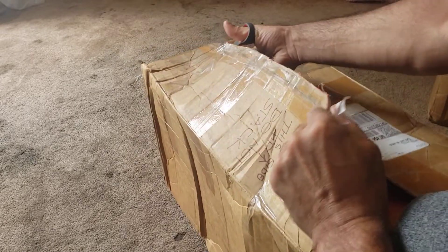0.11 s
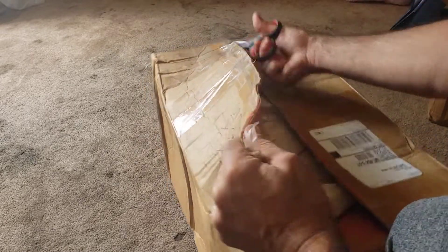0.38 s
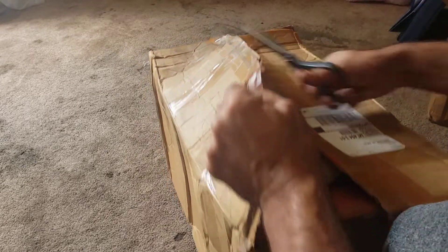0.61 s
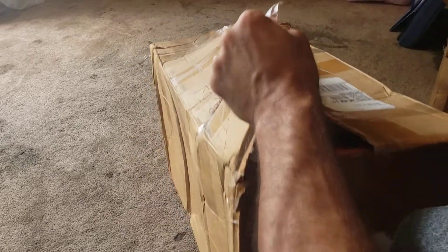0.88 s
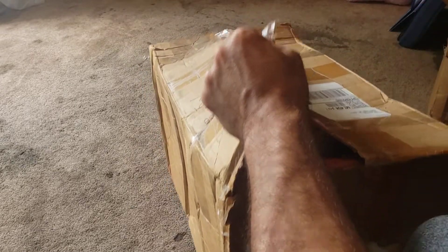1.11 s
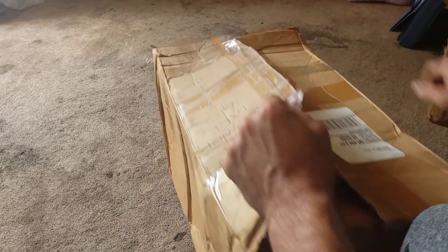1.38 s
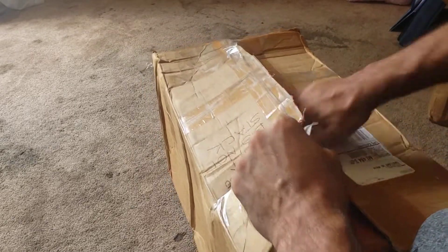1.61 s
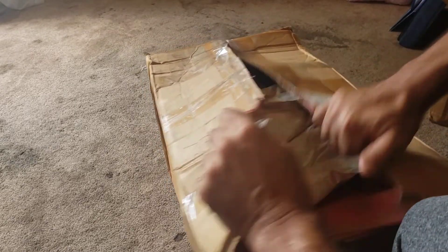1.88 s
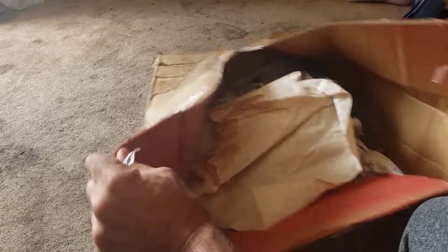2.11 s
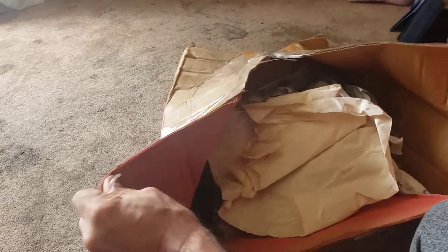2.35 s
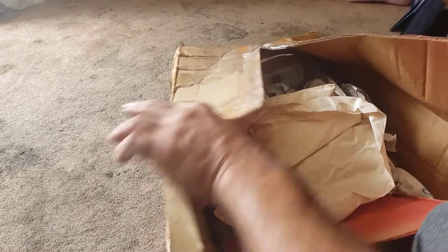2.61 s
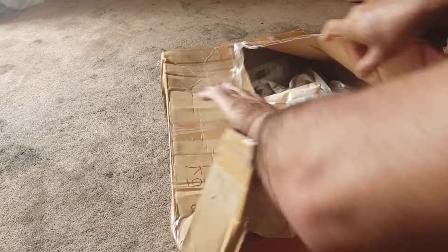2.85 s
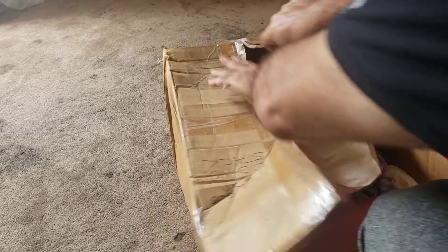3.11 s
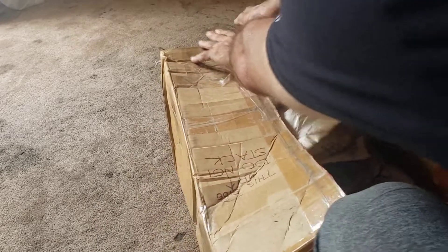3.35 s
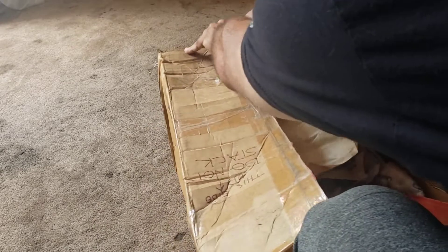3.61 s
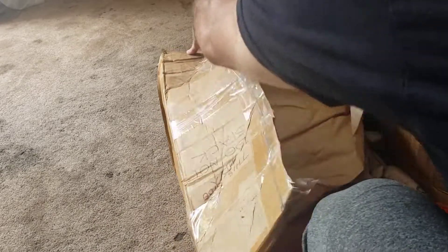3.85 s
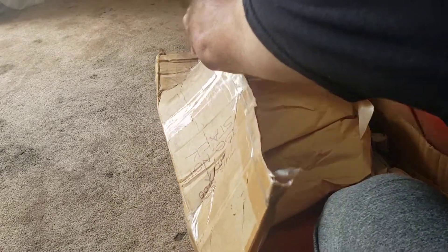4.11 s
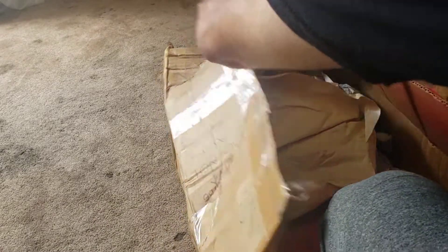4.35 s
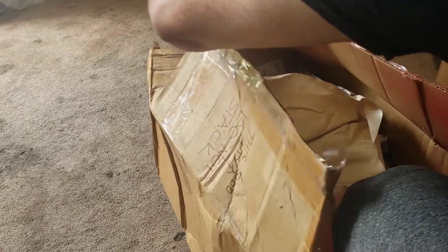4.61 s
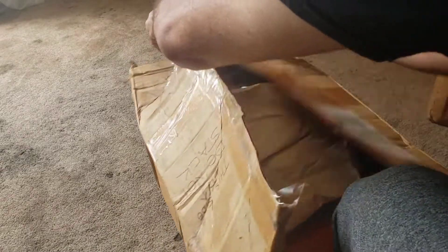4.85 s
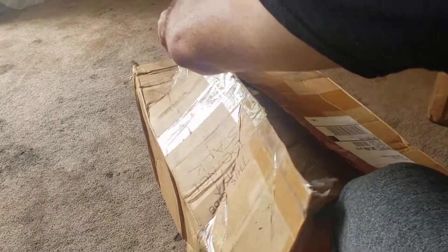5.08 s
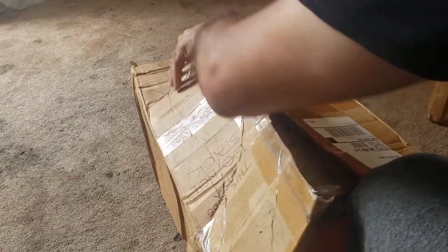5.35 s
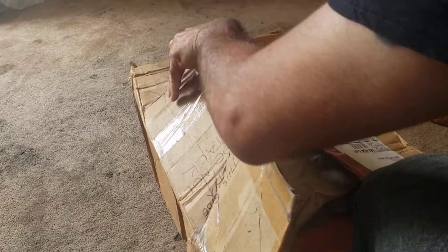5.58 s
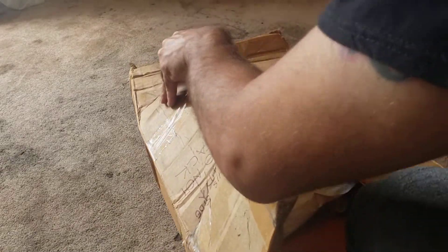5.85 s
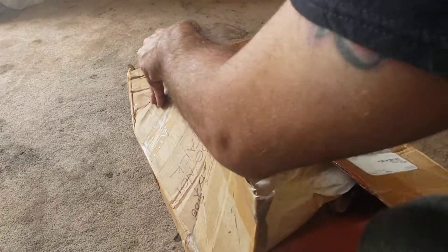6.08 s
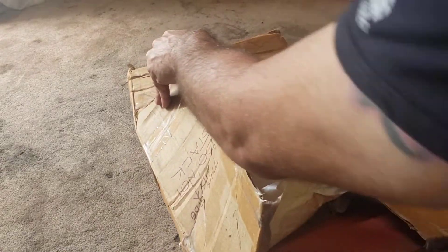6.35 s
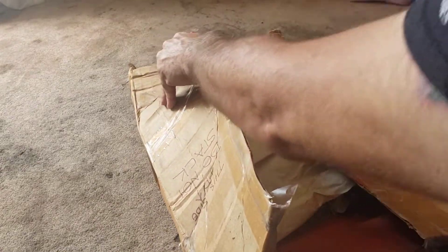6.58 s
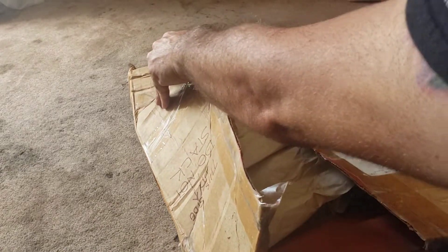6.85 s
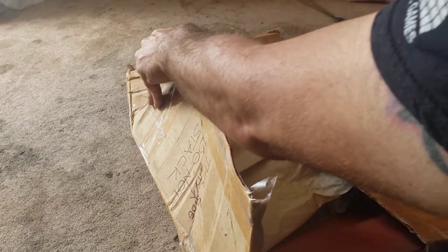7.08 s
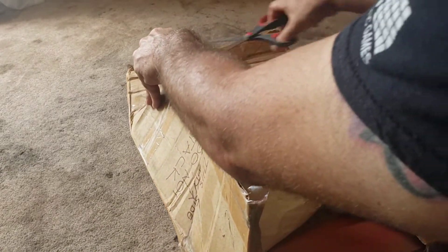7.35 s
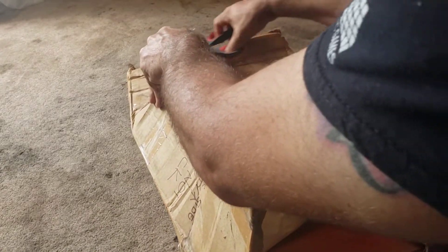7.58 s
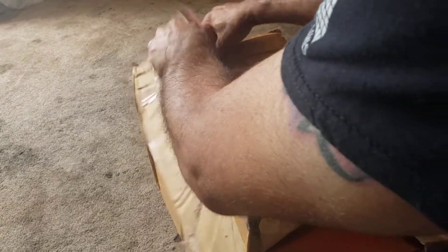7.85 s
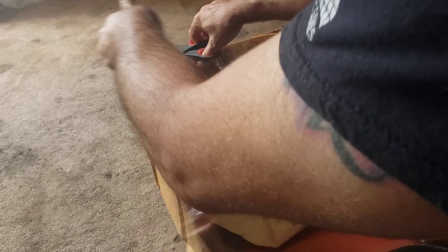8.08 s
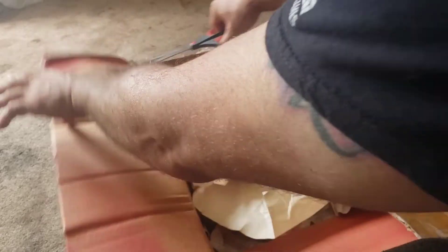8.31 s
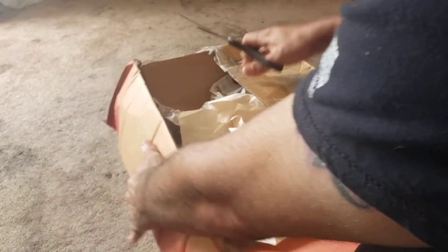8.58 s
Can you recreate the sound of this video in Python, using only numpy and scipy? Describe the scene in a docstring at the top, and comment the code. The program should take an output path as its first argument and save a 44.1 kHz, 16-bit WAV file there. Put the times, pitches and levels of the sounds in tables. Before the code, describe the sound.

Close-up of hands ripping open a taped cardboard box, sharp tape snaps, paper crinkling and hollow board thumps in a quiet room.

```python
"""Hands tear open a taped cardboard box stuffed with paper, in a quiet room, close to two microphones.
Breaking fibres are clumped random clicks over hiss, filtered into creak, scrape, tear and crinkle.
Single snaps are decaying noise bursts, and knocks on the board ring as sums of decaying sines.
The hollow box rumbles in its low modes under uneven pressure and booms when pushed.
Shifting paths, sparse room echoes and steady coloured noise surround these sounds."""
import sys
import numpy as np
from scipy import signal
from scipy.fft import rfft, irfft, next_fast_len
from scipy.io import wavfile
from scipy.ndimage import uniform_filter1d

SR = 44100
rng = np.random.default_rng(int(sys.argv[2]) if len(sys.argv) > 2 else 0)


def linear_from_db(decibels):
    """Turn decibels (scalar or array-like) into linear amplitude factors; 0 gives 1."""
    return 10 ** (np.asarray(decibels, float) / 20)


def transcribe(signal):
    """Save signal, clipped to [-1, 1], as a 16-bit WAV file at the path in sys.argv[1]."""
    frames = np.atleast_2d(signal).T
    limited = np.clip(frames, -1, 1)
    pcm = np.round(limited * 32767).astype(np.int16)
    wavfile.write(sys.argv[1], SR, pcm)


N = 383669

# coherence of a diffuse field at two microphones: frequency_hz, left_right_likeness
FIELD_LIKENESS = [(60, 0.93), (240, 0.71), (950, 0.1), (3770, 0.03), (15000, 0.012)]
# how creak, scrape, tear and crinkle (one row each) follow the hands:
# level_db at an effort of -45 dB, slope_db_per_db, board_share, paper_share
LAYER_LAWS = [(-45, 1, 1, 0.092), (-49, 0.99, 0.53, 0.18), (-46, 1, 0.12, 0), (-46, 0.95, 0.034, 0.85)]


def evened(x):
    """Normalization: scales a signal to rms 1."""
    return x / np.sqrt(np.mean(x ** 2) + 1e-20)


def read(points, hz):
    """Interpolation of a spectrum along a logarithmic frequency axis."""
    table_hz, value = np.transpose(points)
    return np.interp(np.log(hz + 1), np.log(table_hz + 1), value)


def add(mix, start_s, sound):
    """Superposition: adds a sound into the mix from a given time."""
    part = mix[..., max(round(start_s * SR), 0):][..., :sound.shape[-1]]
    part += sound[..., :part.shape[-1]]


def sides(difference_db):
    """Level difference between two channels, split evenly into left and right gains."""
    return linear_from_db(np.array([.5 * difference_db, -.5 * difference_db]))


def colour(points, size=4096):
    """Minimum phase: the causal response of energy 1 that follows from a magnitude spectrum."""
    level_db = np.maximum(read(points, np.fft.rfftfreq(size, 1 / SR)), -70)
    half = level_db * np.log(10) / 20
    full = np.concatenate([half, half[-2:0:-1]])
    # the phase is the Hilbert transform of the log magnitude
    taps = np.fft.ifft(np.exp(np.conj(signal.hilbert(full)))).real[:size // 2]
    return taps / np.linalg.norm(taps)


def fibres(breaks_per_s, spread_db, hiss_share, clump_db, clump_s):
    """Crackling noise: fibres break as random clicks of uneven size, in clumps, over a fine hiss."""
    chance, size = rng.random(N), rng.exponential(1, N)
    sign, fine, slow = rng.standard_normal((3, N))
    clicks = (chance < breaks_per_s / SR) * np.sign(sign) * linear_from_db(spread_db * np.minimum(size, 4.2))
    clumps = evened(signal.lfilter([1], [1, -np.exp(-1 / (clump_s * SR))], slow))
    share = np.clip(hiss_share, 0, 1)
    breaks = np.sqrt(1 - share) * evened(clicks) + np.sqrt(share) * fine
    return evened(breaks * linear_from_db(clump_db * clumps))


def burst(rise_s, fall_db_per_s):
    """Envelope of a rip or drag in dB: linear growth to its peak after a fade-in, then linear decay."""
    rise_s = max(rise_s, .002)
    grown = np.arange(1, SR // 2) / SR / rise_s
    fade_db = 20 * np.log10(np.minimum(4 * grown, 1))
    swell_db = 12.5 * (grown - 1)
    fall_db = -fall_db_per_s * rise_s * (grown - 1)
    return fade_db + np.where(grown < 1, swell_db, fall_db)


def level(base_db, per_db, board_share, paper_share):
    """Addition of incoherent powers: a layer's gain follows the steady effort and every rip."""
    # steady working of the hands: time_s, tearing_db, board_against_tearing_db, paper_against_tearing_db
    effort = [(0.0, -67, -10, 1.5), (.14, -66.5, 4, 3.5), (.29, -54, 5, 4.5), (.4, -51.5, -1, 0.5),
              (.55, -59.5, -4, -1.5), (.62, -69, -6, -1.5), (1.0, -78.5, 0, 2), (1.3, -93, 3, -1),
              (1.52, -77, 7, -6), (1.58, -65, -2, 0), (1.79, -51.5, -5, 4), (1.96, -51, -1.5, -2),
              (2.18, -43, 2.5, 3), (2.45, -60, -1, -2.5), (2.54, -50.5, 3.5, -2.5), (2.68, -49.5, 2, -3),
              (2.85, -52.5, 5, 5.5), (3.15, -44, -1.5, 3.5), (3.471, -44.5, -4.5, -0.5),
              (3.69, -52, 4.5, -1.5), (3.87, -42.5, -11, -2), (4.09, -54.5, -5, -2),
              (4.37, -51.5, -7, -4.5), (4.54, -67.5, 2, -4), (4.75, -58, 3.5, -0.5),
              (5.14, -67.5, -14, -1.5), (5.3, -60.5, -24, 4), (5.47, -57.5, -5, 8), (5.83, -65, -10, 2.5),
              (5.88, -76.5, 0.5, 7.5), (6.1, -80.5, -1, 8.5), (6.45, -90.5, 7, 13), (6.62, -93.5, 9.5, 2),
              (6.9, -91, 16.5, 10), (7.15, -79, -3, 8.5), (7.37, -85.5, -4, 13), (7.539, -74, -10, -2),
              (7.8, -81, 8, 4.5), (8.02, -58, 5.5, -3), (8.27, -57, -1.5, 3), (8.7, -63.5, -3, 0.5)]
    # sudden rips and rustles: start_s, rise_s, tearing_db, board_against_tearing_db, fall_db_per_s
    rips = [(0.0, 0.024, -46.5, -5.5, 149), (.344, .003, -37, -14, 352), (.74, .015, -66, -33, 200),
            (0.448, 0.048, -47, -1.5, 300), (1.085, 0.014, -61, -32, 255), (2.01, 0.016, -29.5, -1, 254),
            (2.239, 0.055, -34.5, 2, 147), (2.54, 0.011, -45, -7, 202.5), (2.62, 0.015, -39.5, -25, 149),
            (2.73, 0.02, -39, -4, 99), (2.891, .03, -38.5, -17, 89.5), (3.228, 0.087, -37.5, -3.5, 119),
            (3.0, .02, -50, -6.5, 100), (3.56, 0.069, -36, -12.5, 254.5),
            (3.77, 0.086, -35.5, -19.5, 400.5), (3.893, 0.048, -19.5, -5, 262),
            (4.399, 0.021, -49, -0.5, 159.5), (4.571, 0.018, -45, -12, 198), (4.659, .006, -49, -8, 151.5),
            (4.8, 0.034, -46, -1.5, 90), (5.179, 0.017, -49, -10.5, 63), (6.648, 0.0047, -62.5, 14, 209),
            (7.541, .1, -50, -3, 243), (7.851, 0.017, -25, -1.5, 211), (8.141, .01, -55, 4, 200),
            (7.94, 0.009, -44, 12, 307), (8.277, 0.0045, -50, 4, 142), (8.438, .006, -54, 4, 136),
            (8.56, 0.021, -50.5, -1, 137)]

    def law(tearing_db, board_db):
        return base_db + per_db * (tearing_db + 45) + board_share * board_db

    time_s, tearing_db, board_db, paper_db = np.transpose(effort)
    steady_db = law(tearing_db, board_db) + paper_share * paper_db
    power = linear_from_db(np.interp(np.arange(N) / SR, time_s, steady_db)) ** 2
    for start_s, rise_s, peak_db, rip_board_db, fall in rips:
        add(power, start_s, linear_from_db(law(peak_db + burst(rise_s, fall), rip_board_db)) ** 2)
    return np.sqrt(power)


def handling():
    """Fracture and friction: creaking, scraping, tearing and crinkling layers share many breaks."""
    # spectra of creaking and scraping board, tearing tape and crinkling paper:
    # frequency_hz, relative_level_db (per Hz)
    creak = [(160, -20.5), (280, -3.5), (613, -2), (737, -3.5), (1100, -11.5), (1430, -31.5), (2420, -120)]
    scrape = [(590, -31), (1000, -11), (1550, -8.5), (2090, -11), (3000, -14), (3900, -34), (6600, -120)]
    tear = [(1760, -30.5), (3000, -9), (3900, -4), (4310, -4.5), (4620, -4), (5790, -1), (8500, -7),
            (11000, -42.5), (18700, -120)]
    crinkle = [(5000, -37), (8500, -1.5), (11600, 1.5), (15100, 4), (16000, -3.5)]
    # cardboard dragged over cardboard: start_s, rise_s, scrape_db, fall_db_per_s
    drags = [(2.011, 0.0036, -31.5, 900), (2.62, 0.017, -44, 196), (2.72, 0.019, -43, 115),
             (2.98, 0.026, -42, 161), (3.895, 0.04, -19.5, 279), (4.4, 0.0083, -46, 215),
             (5.18, .01, -61, 109), (5.38, 0.15, -66, 50), (5.68, 0.048, -84, 65), (7.57, .07, -62, 258),
             (7.859, 0.0032, -33, 256), (8.06, 0.017, -50, 150)]

    shared = fibres(600, 5, 0.5, 1.6, .014)
    board = fibres(700, 3.9, .45, 1.4, 0.016)
    tape = fibres(1700, 4.4, 0.42, 0.43, 0.046)
    paper = fibres(2300, 4.5, 0.72, 4.5, 0.057)
    # spectrum, own breaks, amount of shared breaks
    layers = [(creak, board, .45), (scrape, board, .6), (tear, tape, .7), (crinkle, paper, .65)]

    gains = [level(*law) for law in LAYER_LAWS]
    drag_power = np.zeros(N)
    for start_s, rise_s, scrape_db, fall in drags:
        add(drag_power, start_s, linear_from_db(scrape_db + burst(rise_s, fall)) ** 2)
    gains[1] = np.sqrt(gains[1] ** 2 + drag_power)  # drags sound in the scrape layer

    out = np.zeros(N)
    for gain, (spectrum, own, amount) in zip(gains, layers):
        breaks = evened(own + amount * shared) * gain
        out += signal.oaconvolve(breaks, colour(spectrum))[:N]
    return out


def hollow(shake, modes):
    """Modal resonance: a shaking force rings low modes, through a response of energy 1."""
    t = np.arange(12000) / SR
    ring = np.zeros(len(t))
    for hz, width_hz, db in modes:
        decay_db = 8.7 * np.pi * width_hz * t  # a wider resonance dies sooner
        ring += linear_from_db(db - decay_db) * np.sqrt(width_hz) * np.sin(2 * np.pi * hz * t)
    return signal.oaconvolve(shake, ring / np.linalg.norm(ring))[:N]


def box():
    """Forced and free vibration: uneven pressure shakes walls and floor over a hum; pushes boom and die."""
    # low modes of box and room, the floor's first: frequency_hz, width_hz, relative_level_db
    low_modes = [(57.3, 4.9, -6), (113, 9.4, -3.5), (146, 55, -0.5), (206.8, 37, 0.5)]
    # how hard the walls are pressed, one table for each spell of pressing: time_s, walls_db
    presses = [
        [(0.0, -42.5), (0.174, -61), (0.19, -51.5), (0.37, -49), (0.43, -55), (0.474, -35), (0.768, -80.5),
         (1.062, -84), (1.085, -60)],
        [(1.085, -51), (1.113, -51.5), (1.309, -58.5), (1.499, -76), (1.543, -50), (2.347, -40), (2.435, -53.5),
         (2.815, -40.5), (2.836, -39)],
        [(2.836, -26), (2.85, -28), (2.902, -47), (2.928, -32.5), (3.088, -59), (3.12, -42.5), (3.282, -50.5),
         (3.866, -51), (3.891, -45)],
        [(3.891, -30), (3.959, -35.5), (4.117, -60), (4.417, -45), (4.561, -70), (4.755, -58), (4.829, -46),
         (5.113, -67), (5.18, -70)],
        [(5.18, -55), (5.19, -57.5), (6.22, -76.5), (6.88, -55), (6.95, -75), (7.39, -88.5), (7.61, -57.5),
         (7.83, -56), (7.85, -35.5)],
        [(7.852, -31.5), (7.87, -28), (8.074, -47.5), (8.284, -50.5), (8.356, -31.5), (8.414, -68),
         (8.462, -45), (8.518, -50), (8.7, -53)],
    ]
    # pushes that make the box boom: start_s, level_db (before the push ramp), pitch_hz, t60_s
    booms = [(0.193, -34.5, 156, 0.1), (0.288, -36.5, 143, 0.17), (0.461, -17.5, 126, 0.066),
             (1.113, -26.5, 119, 0.073), (1.257, -29, 131, 0.098), (1.548, -32, 114, 0.12),
             (1.8, -22, 64.7, 0.095), (1.864, -25, 96, 0.085), (2.001, -35.5, 216, 0.15),
             (2.53, -36, 92.7, 0.126), (2.732, -29, 68.5, 0.21), (2.38, -38, 53.4, 0.2),
             (2.838, -17.5, 185.6, 0.09), (3.112, -38, 218, 0.088), (3.891, -14, 221, 0.042),
             (4.281, -43, 134, 0.16), (4.816, -26, 98, 0.15), (4.87, -30, 51.4, 0.2),
             (5.186, -47, 201.6, 0.17), (5.407, -46.5, 60, 0.15), (6.639, -52.5, 314.4, 0.3),
             (6.805, -42, 110, 0.43), (7.573, -62.5, 94.2, 0.12), (7.683, -46, 120, 0.22),
             (7.857, -13.5, 239, 0.12), (7.92, -27, 50.04, 0.25), (7.943, -22, 184, 0.14),
             (8.153, -40.5, 210, 0.14), (8.324, -28.5, 140, 0.14), (8.445, -23.5, 155.3, 0.11)]
    hum_db = -65  # hum of the house, as noise driving the modes

    t = np.arange(N) / SR
    walls_db = np.interp(t, *np.vstack(presses).T)
    pressure = fibres(200, 3.9, 0.74, 2.1, 0.041)
    sound = hollow(pressure * linear_from_db(walls_db), low_modes[1:])

    floor_db = -57.5 + .8 * (walls_db + 50)  # the floor follows the walls less steeply
    floor = pressure * linear_from_db(floor_db) + linear_from_db(hum_db) * rng.standard_normal(N)
    sound += hollow(floor, low_modes[:1])
    sound += linear_from_db(hum_db - 6.0) * hollow(rng.standard_normal(N), low_modes[1:])

    u = t[:12000]
    for start_s, db, hz, t60_s in booms:
        # the hand presses in for 1.2 cycles before the wall lets go
        push = np.clip(u * hz / 1.2, 0, 1) ** 2
        decay = linear_from_db(db - 60 * u / max(t60_s, .02))
        add(sound, start_s, decay * push * np.sin(2 * np.pi * hz * u))
    return sound


def room_tone():
    """Stationary noise of given coherence: the still air of the room and the hiss of the microphones."""
    # spectrum of the quiet: frequency_hz, relative_level_db (per Hz)
    quiet = [(88, -32.5), (150, -1.5), (226, 2.5), (1260, -18.5), (1790, -23.5), (4160, -29), (7180, -22),
             (8400, -43), (11700, -22.5), (15100, -14.5), (16000, -27)]
    size = next_fast_len(N)
    hz = np.fft.rfftfreq(size, 1 / SR)
    a, b = rfft(rng.standard_normal((2, size)))
    same = np.clip(read(FIELD_LIKENESS, hz), -1, 1)
    pair = np.array([a, same * a + np.sqrt(1 - same ** 2) * b])
    tone = irfft(pair * linear_from_db(read(quiet, hz)), size)[:, :N]
    return linear_from_db(-71) * evened(tone)


def knocks():
    """Modal excitation: a knocked flap rings in the board's modes, most near the struck spot's pitch."""
    # fingers and scissors knocking the board: start_s, peak_db, pitch_hz
    knock_table = [(0.017, -34, 917), (0.345, -29.5, 732), (0.448, -36.5, 784), (0.508, -31, 510),
                   (2.016, -18.5, 425), (2.096, -32, 457), (2.216, -27, 950), (2.264, -28, 770),
                   (2.302, -27.5, 387), (2.483, -36.5, 440), (2.632, -34.5, 1330), (2.741, -32, 393),
                   (2.841, -29, 354), (2.923, -34, 307), (2.994, -32.5, 520), (3.237, -33.5, 530),
                   (3.27, -30.5, 650), (3.893, -20, 503), (3.917, -16.5, 934), (4.407, -38, 1520),
                   (4.662, -48, 790), (5.188, -41, 500), (5.93, -55, 1010), (6.035, -56, 384),
                   (6.653, -35.5, 350), (6.755, -44, 428), (7.435, -56, 442), (7.546, -51, 717),
                   (7.585, -44.5, 660), (7.867, -12.5, 273), (7.947, -23, 620), (8.15, -33.5, 393),
                   (8.286, -44, 409), (8.337, -36, 545), (8.439, -39.5, 332), (8.56, -43, 400)]
    # modes of a tapped flap, before scatter and scaling: frequency_hz, relative_level_db, t60_s
    board_modes = [(644, 0, 0.083), (850, 8, 0.11), (1190, -21, 0.15), (1656, -5, 0.16),
                   (1910, -15.5, 0.57), (2567, -34.5, 0.59)]
    out, t = np.zeros(N), np.arange(5000) / SR
    draws = rng.standard_normal((len(knock_table), len(board_modes)))
    for (start_s, peak_db, pitch_hz), draw in zip(knock_table, draws):
        flap = np.exp(-t / 0.0074) * np.sin(2 * np.pi * pitch_hz * t)
        for (hz, db, t60_s), shift in zip(board_modes, draw):
            decay = linear_from_db(db - 16 - 60 * t / (0.86 * t60_s))
            flap += decay * np.sin(2 * np.pi * hz * (1 + 0.089 * shift) * t)  # modes differ by knock
        add(out, start_s, linear_from_db(peak_db) * flap / abs(flap).max())
    return out


def snaps():
    """Impulsive fracture: each snap is a brief crack with a short fizz; stiffer pieces add a fuller body."""
    # the clearest snaps of tape, paper and board: start_s, crack_peak_db, body_rms_db
    snap_table = [(0.0175, -15, -46.5), (0.1585, -41, -70), (0.1814, -36.5, -77), (0.3458, -20.5, -37),
                  (0.4899, -26.5, -51), (0.741, -44, -69), (0.841, -36, -84), (0.85, -39.5, -83),
                  (1.053, -41, -83), (1.091, -37, -74), (1.5466, -34.5, -98), (1.8053, -24.5, -42),
                  (1.8771, -23.5, -49.5), (1.9498, -31, -54), (1.9739, -27, -51.5), (2.017, -11, -35),
                  (2.2283, -18.5, -42.5), (2.2634, -13.5, -32.5), (2.2999, -5, -38), (2.5511, -22.5, -40),
                  (2.6075, -23.5, -46.5), (2.6351, -23.5, -43), (2.7566, -14, -33), (2.8837, -24.5, -50),
                  (2.916, -23.5, -40.5), (3.068, -27, -40), (3.1037, -18, -52.5), (3.3537, -18.5, -39),
                  (3.5686, -28, -33.5), (3.6097, -20, -36.5), (3.63, -23, -33), (3.723, -25.5, -34.5),
                  (3.7781, -11.5, -34.5), (3.8395, -22.5, -37.5), (3.8462, -27, -37), (3.893, -15, -19.5),
                  (4.1585, -27, -48), (4.4114, -29.5, -38.5), (4.5725, -29, -42.5), (4.5863, -32.5, -45.5),
                  (4.6647, -26, -44.5), (4.9113, -21.5, -47.5), (5.1813, -48, -54.5), (5.633, -48, -69),
                  (5.897, -38, -79), (6.312, -49.5, -83), (6.653, -37.5, -49.5), (7.457, -46, -64),
                  (7.8605, -16.5, -27.5), (7.867, -8, -34), (8.2847, -23.5, -45), (8.3042, -24, -59),
                  (8.4395, -34, -53.5)]
    out, t = np.zeros(N), np.arange(3000) / SR

    # lesser snaps at random times, 22 per second, set by the tearing of the moment
    tearing = level(*LAYER_LAWS[2])
    at, smallness = rng.random((2, int(22 * N / SR)))
    now_db = 20 * np.log10(tearing[(at * N).astype(int)]) - 9.5 * smallness
    rows = list(snap_table) + list(zip(at * N / SR, now_db + 12, now_db + 5))

    crack_s, fizz_s = .0006, 0.019  # decay time constants
    envelope = np.exp(-t / crack_s) + 0.058 * np.exp(-t / fizz_s)
    noise = rng.standard_normal((len(rows), 3000)) * envelope
    cracks = signal.lfilter(*signal.butter(2, 7500, "high", fs=SR), noise)
    bodies = signal.lfilter(*signal.butter(2, [1100, 7500], "band", fs=SR), noise)
    for (start_s, crack_db, body_db), crack, body in zip(rows, cracks, bodies):
        crack = linear_from_db(crack_db) * crack / abs(crack).max()
        body = linear_from_db(body_db) * body / body[:round(.004 * SR)].std()  # rms over the first 4 ms
        add(out, start_s, crack + body)
    return out


def nearby(x, spread_bins, patchy_db):
    """Scattering: around moving flaps and hands, colour and the path to each microphone keep shifting."""
    # unequal paths to the microphones: frequency_hz, phase_spread_rad
    path_spread = [(60, 0.071), (300, 0.1), (1000, 1.07), (3000, 1.48), (12000, 1.5)]
    hz, t, z = signal.stft(x, SR, nperseg=256, noverlap=192)
    field = rng.standard_normal((3, len(t), len(hz))).transpose(0, 2, 1)
    field = uniform_filter1d(field, size=spread_bins, axis=1)  # smooth over frequency
    field = evened(uniform_filter1d(field, size=40, axis=2))  # smooth over time
    turn = np.exp(1j * read(path_spread, hz)[:, None] * field[:2])
    shifted = z * turn * linear_from_db(patchy_db * field[2])
    return signal.istft(shifted, SR, nperseg=256, noverlap=192)[1][:, :N]


def room(x):
    """Reverberation: sparse echoes of random sign decay band by band; three patterns trade places."""
    # reverberation time: frequency_hz, t60_s
    decay_times = [(120, 0.29), (500, 0.13), (2000, 0.22), (6000, 0.3), (14000, 0.16)]
    taps = np.zeros((3, 2, SR // 2))
    at = np.arange(300, SR // 2 - 20, 20)
    at = at + rng.integers(0, 20, (3, 2, len(at)))  # one echo in every 20 samples
    np.put_along_axis(taps, at, rng.choice([-1., 1.], at.shape), 2)

    hz, t, z = signal.stft(taps, SR, nperseg=1024)
    same = np.clip(read(FIELD_LIKENESS, hz), 0, 1)[:, None]  # long waves reach both microphones alike
    z[:, 1] = same * z[:, 0] + np.sqrt(1 - same ** 2) * z[:, 1]
    decay = linear_from_db(-60 * t / read(decay_times, hz)[:, None])
    tails = signal.istft(z * decay, SR, nperseg=1024)[1]

    # the source moves among three spots, each with its own echoes
    phase = np.pi * (np.arange(N) / SR * 4.5 + np.arange(3)[:, None] / 3)
    spots = np.sqrt(2 / 3) * np.cos(phase)
    out = np.zeros((2, N))
    for spot, tail in zip(spots, tails):
        source = (x.mean(0) * spot)[None]
        out += signal.oaconvolve(source, tail / np.linalg.norm(tail[0]), axes=1)[:, :N]
    return out


def scene():
    """Superposition of direct and reverberant sound: the box close by, its room and the quiet behind."""
    # where the hands are: time_s, left_minus_right_db
    hand_places = [(0.0, 1), (0.58, -1.5), (0.68, 0.5), (1.67, -4), (2.81, -1.5), (2.93, 0.5), (3.27, -1.5),
                   (3.63, 0), (3.85, 2), (4.04, 2), (6.08, 0), (6.2, -4.5), (6.489, 0), (6.54, -2.5),
                   (7.41, -5.5), (7.49, -1), (7.8, 1), (8.7, -1.5)]
    place = sides(np.interp(np.arange(N) / SR, *np.transpose(hand_places)))
    rustle = linear_from_db(-1.0) * handling() * place + linear_from_db(1.0) * box()
    quiet = room_tone()
    hits = (knocks() + snaps()) * place
    close = nearby(rustle, 5, 1.3) + nearby(hits, 16, 1.5)
    return close + linear_from_db(-8) * room(rustle + hits) + quiet


def roll_off(x):
    """The treble ends steeply here."""
    return signal.sosfilt(signal.butter(12, 16960, fs=SR, output="sos"), x)


def record(dry):
    """Linear filtering: the microphone ports differ in treble, share a dip and lose bass; a band limit follows."""
    # response shared by both ports: frequency_hz, gain_db
    microphone = [(20, -29), (32, -17), (50, -4), (7000, 2), (8400, -4), (10000, 3.5)]
    # difference of the ports: frequency_hz, left_minus_right_db
    port_difference = [(60, -2.5), (110, -2), (200, 1), (380, -2), (700, 0), (1290, -1), (2380, -3.5),
                       (4400, 3.5), (8120, -7), (15000, -10)]
    size = next_fast_len(N)
    hz = np.fft.rfftfreq(size, 1 / SR)
    ports = sides(read(port_difference, hz)) * linear_from_db(read(microphone, hz))
    band_limit = hz < 15900  # not part of the microphone's response
    mix = irfft(rfft(dry, size) * ports * band_limit, size)[:, :N]
    return roll_off(mix)


dry = scene()
out = record(dry)
transcribe(out)
```